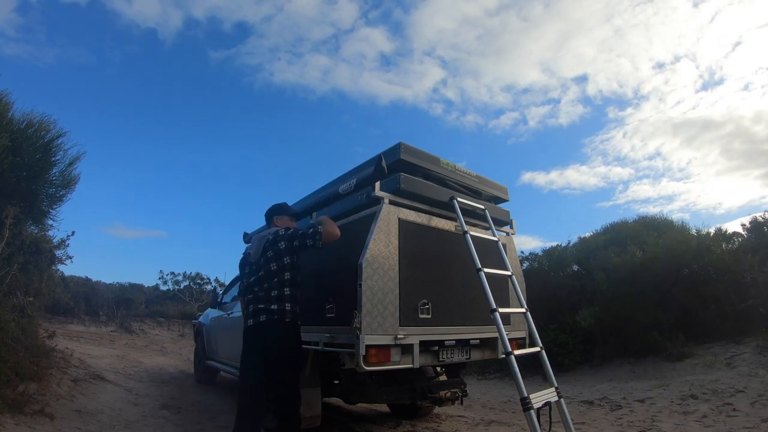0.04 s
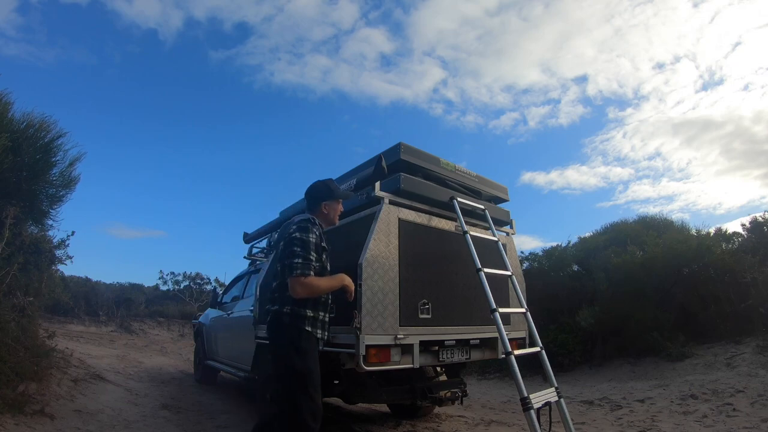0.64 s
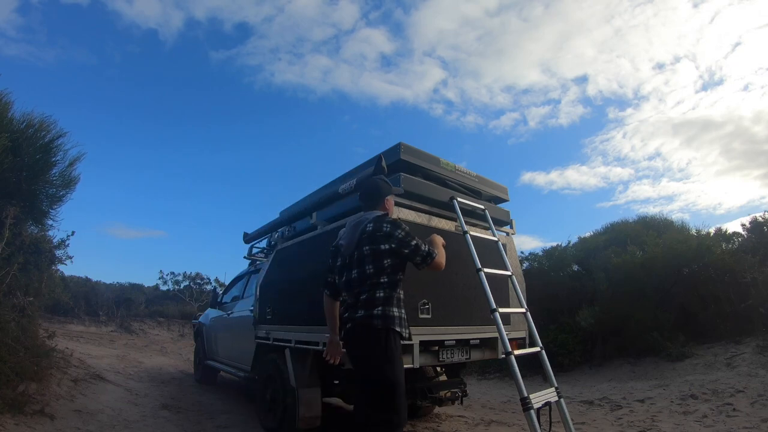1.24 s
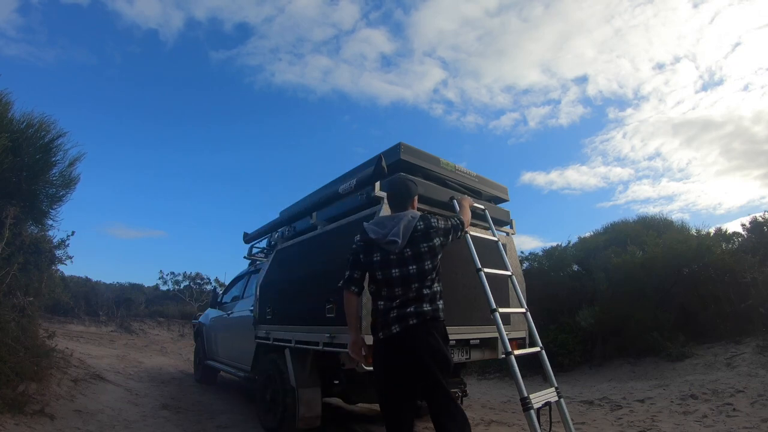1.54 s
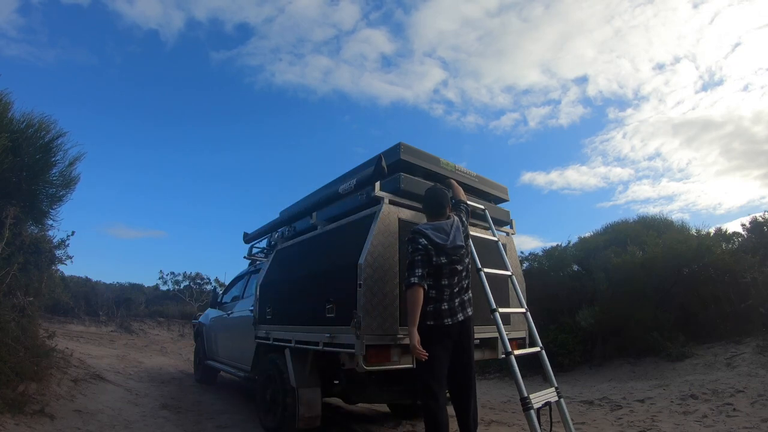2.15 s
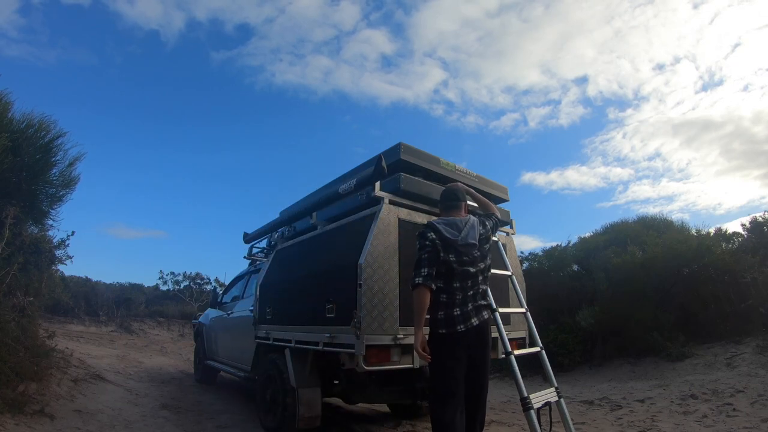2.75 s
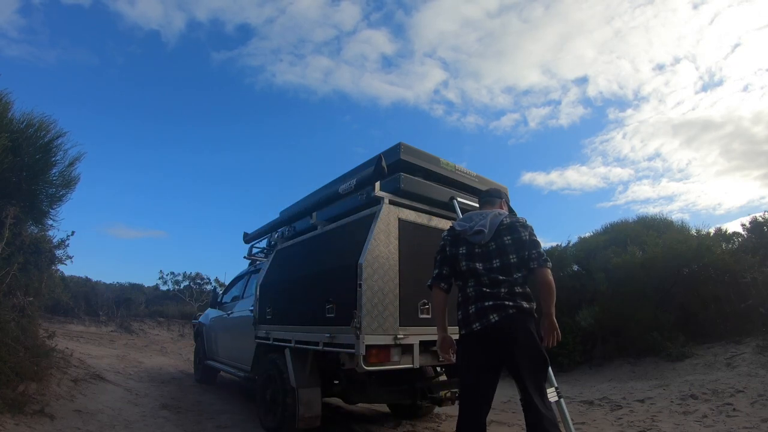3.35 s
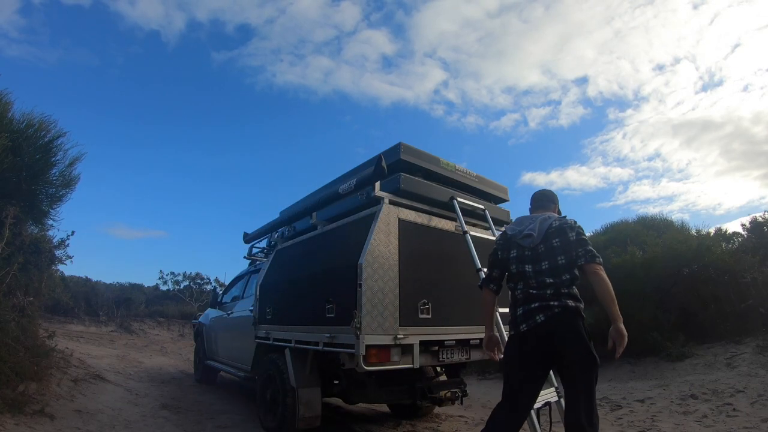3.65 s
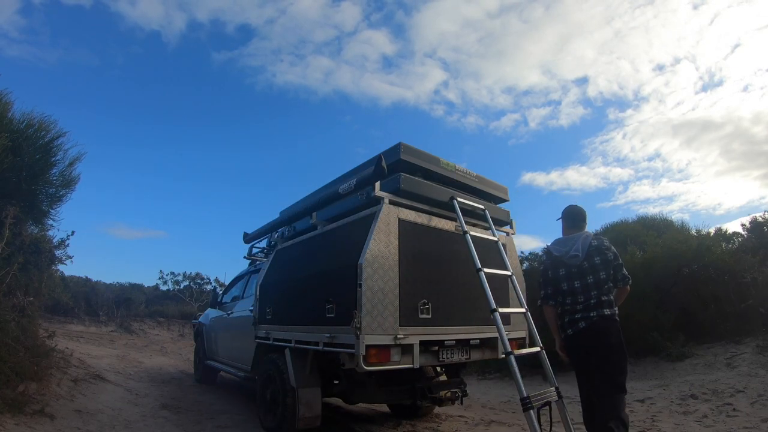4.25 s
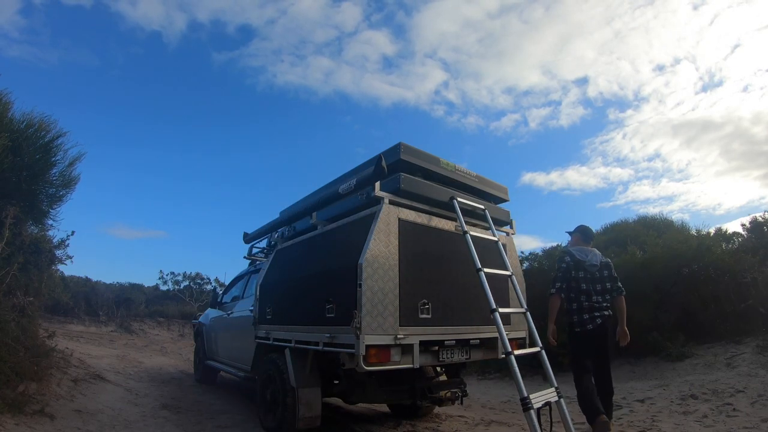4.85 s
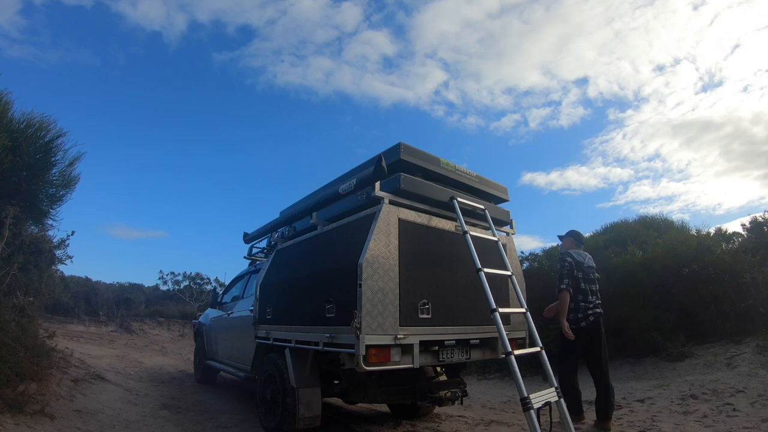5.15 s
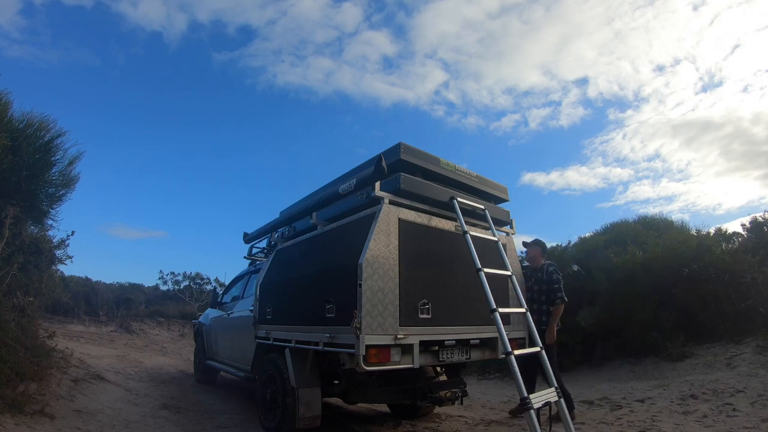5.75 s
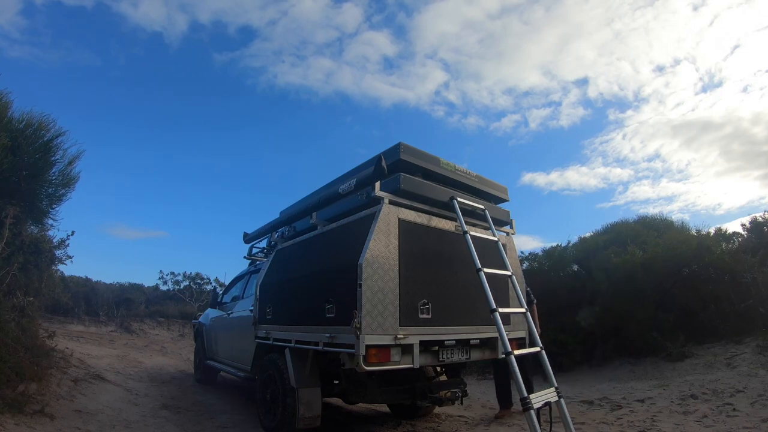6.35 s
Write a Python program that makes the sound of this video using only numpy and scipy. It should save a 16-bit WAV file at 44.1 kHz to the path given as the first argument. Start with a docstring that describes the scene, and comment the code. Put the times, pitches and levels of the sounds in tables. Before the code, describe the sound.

Light wind rumbles on the microphone throughout, over a soft outdoor hush of scrub. It gusts during the first 0.7 seconds, and shoes scuff faintly in sand around 0.4 and 1.1 seconds. From about 1.9 to 2.6 seconds, a fabric cover is pulled over a rooftop tent in two quick, rasping swishes that trail off. Its folds snap sharply as they jerk taut, most clearly at 2.1 and 2.3 seconds, while the hollow shell thuds and rings softly underneath. This is the most prominent moment. A few more faint sandy scuffs come between 2.8 and 4.7 seconds, and the wind rumble swells again from about 4 to 4.7 seconds. From around 6 to 6.5 seconds, gear shifts behind the vehicle with a quiet, dull scrape, a few small clacks and a light hollow knock.

```python
"""A sandy campsite in a light wind, where a fabric cover is pulled on a rooftop tent.
Gusts rumble on the microphone over a hush of scrub, and shoes scuff faintly in the sand.
The cloth gives two quick swishes, sticking and slipping over the hollow shell, which rings and booms;
folds snap as they jerk taut. Near the end, gear shifts behind the vehicle with a few small clacks."""
import sys
import numpy as np
from scipy import signal
from scipy.fft import rfft, irfft
from scipy.io import wavfile
from scipy.ndimage import uniform_filter1d

SR = 44100
rng = np.random.default_rng(int(sys.argv[2]) if len(sys.argv) > 2 else 0)


def dump_mix(stems):
    """Bounce the given channels to the path in sys.argv[1] as a 16-bit WAV at rate SR."""
    frames = np.atleast_2d(stems).T  # one column per channel
    limited = np.clip(frames, -1, 1)  # hard clip at full scale
    pcm = np.round(limited * 32767).astype(np.int16)
    wavfile.write(sys.argv[1], SR, pcm)


N = 291060
TIME = np.arange(N) / SR

# gusts on the microphone: (time [s], peak rumble [dB], half-length [s])
MIC_GUSTS = [(.02, -42.5, 0.019), (.26, -41, 0.044), (.34, -40, 0.054), (.49, -46, 0.038),
             (.635, -44, 0.019), (.73, -70, 0.02), (1.13, -51, .14), (2.12, -52.5, 0.2),
             (4.08, -48.5, 0.063), (4.245, -42.5, 0.022), (4.3, -40, 0.028), (4.39, -49.5, 0.1),
             (4.64, -47.5, 0.047), (5.16, -53, 0.086), (5.45, -56.5, 0.1), (6.14, -50, 0.038),
             (6.38, -54, 0.052)]
LULL_DB = -60.5  # rumble between gusts
# tone of the pressure swell, mic rumble, still air and breeze: (frequency [Hz], level [dB])
SWELL_EQ = [(1, -6.5), (2.5, 4), (6.5, -12.5), (10, -12), (16, -35.5), (25, -30.5), (60, -93)]
RUMBLE_EQ = [(8, -37.5), (18, 8), (30, 4), (50, -3.5), (80, -10), (130, -31), (250, -40), (600, -63),
             (2000, -83)]
AIR_EQ = [(20, -8), (60, 0), (120, -1), (200, -5.5), (400, -6), (700, -10), (1200, -15), (2000, -19.5),
          (4000, -23), (8000, -26.5), (15500, -30)]
BREEZE_EQ = [(70, 4), (160, 2), (260, -8), (460, -8), (700, -20.5), (1500, -20), (6000, -46)]
# breeze in the scrub between gusts: (time [s], level [dB])
BREEZE_BED = [(0, -76), (1.4, -71), (3.7, -73), (4.4, -71), (6.6, -64)]
# shoes in sand: (time [s], level [dB], length [s])
SHOE_SCUFFS = [(0.412, -60.5, 0.042), (0.452, -69.5, 0.098), (1.124, -68.5, 0.16), (2.825, -69.5, 0.18),
               (3.432, -61.5, 0.04), (4.215, -68, 0.081), (4.644, -67.5, 0.065)]
# tone of grinding sand: (frequency [Hz], level [dB])
SAND_EQ = [(300, 8.5), (1000, -2), (1700, -2), (3800, -6.5), (6000, -15.5), (12000, -28)]
# soft bumps on tent and vehicle: (time [s], peak [dB], pitch [Hz])
SOFT_BUMPS = [(1.464, -55.5, 217), (1.954, -49.5, 182), (2.001, -41, 104), (2.067, -45.5, 299),
              (2.213, -49, 111), (6.10, -56.5, 232), (6.21, -60, 310), (6.272, -58, 217)]
# the shell booms as a stroke ends: (time [s], level [dB])
SHELL_BOOMS = [(2.083, -57), (2.42, -64.5), (2.58, -76)]
# strokes of the cover: first slide, tug, long pull, run-out, trailing slide, last brush
# (start [s], attack [s], hold [s], release [s], level [dB], brightness [dB/octave])
COVER_PULLS = [(1.874, 0.018, 0.086, 0.21, -59.5, 0.4), (1.963, 0.06, 0.059, 0.037, -52.5, 0.5),
               (2.091, 0.11, 0.085, 0.2, -52, -0.1), (2.305, .02, 0.038, 0.086, -60, .3),
               (2.403, 0.062, 0.13, 0.01, -66, 0.7), (2.55, 0.019, 0.036, 0.01, -66.5, -3)]
# tone of the cloth's fine slips and coarse grit: (frequency [Hz], level [dB])
CLOTH_EQ = [(150, 4), (270, 4.5), (470, -1.5), (730, 2.5), (900, -0.5), (1500, 3), (1850, -2), (2300, -2),
            (3800, -3), (5000, -9), (6100, -18.5), (7500, -8), (10500, -17), (15500, -24)]
GRIT_EQ = [(400, -10), (900, 0), (2500, 0), (4500, -6.5), (6000, -25), (12000, -30)]
# rasp of the weave, higher as the cloth speeds up: (time [s], centre [Hz], width [Hz], level [dB])
WEAVE_RASP = [(1.88, 1400, 695, -85), (1.89, 1350, 799, -57), (1.981, 1700, 898, -74),
              (2.035, 1750, 803, -59), (2.065, 1700, 700.4, -68), (2.131, 1500, 888, -66),
              (2.21, 2300, 2381, -55), (2.221, 2900, 2800, -49), (2.248, 2700, 2412, -47.5),
              (2.261, 2450, 2606, -56), (2.28, 2200, 2005, -49), (2.31, 1750, 1910, -53.5),
              (2.35, 1470, 593, -57), (2.393, 1500, 740, -56), (2.43, 1400, 498, -119)]
# resonances of the tent's panel: (frequency [Hz], width [Hz], gain [dB])
PANEL_MODES = [(892, 47, 3), (1140, 33, 0), (1478, 14, 1), (1640, 26, -9), (2070, 17, -12), (2190, 20, 2),
               (2320, 22, 1), (2510, 25, -5), (2840, 45, -19)]
# folds snap taut: (time [s], peak [dB], pitch [Hz], crack against swing [ratio])
FOLD_SNAPS = [(1.955, -39, 1680, 0.3), (1.981, -48, 1300, .3), (2.07, -33, 1540, 0.74),
              (2.0802, -32.5, 930, 0.67), (2.0842, -60, 870, .3), (2.2032, -38.5, 950, .2),
              (2.229, -43, 3000, 0.8), (2.272, -32.5, 1400, 0.31), (2.2902, -29.5, 1018, 0.67),
              (2.572, -49.5, 650, .1)]
# gear shifts behind the vehicle: (start [s], attack [s], hold [s], release [s], level [dB])
GEAR_MOVES = [(5.97, 0.14, 0.288, 0.031, -65.5), (6.495, 0.029, 0.014, 0.037, -70)]
# tone of its dull scrape: (frequency [Hz], level [dB])
SCRAPE_EQ = [(50, 5), (110, -13), (320, 9.5), (500, -6), (1200, -4), (3000, -15.5), (6000, -31),
             (12000, -53)]
# hard edges meet: (time [s], level [dB], pitch [Hz], decay [s])
EDGE_TICKS = [(6.055, -54, 3600, .0005), (6.1015, -51, 1900, .0009), (6.113, -57.5, 4240, 0.0029),
              (6.2796, -51, 1200, .002), (6.354, -53, 1300, .001), (6.3848, -49.5, 2000, .0016)]
# small parts clack: (time [s], level [dB], centre [Hz], width [Hz], length [s], clean ring [0-1])
GEAR_CLACKS = [(6.1015, -53.5, 1290, 800, 0.019, 0.2), (6.111, -55, 727, 350, 0.048, 0.6),
               (6.1132, -52, 2100, 1800, 0.023, 0.06), (6.203, -64, 1900, 2400, 0.035, 0),
               (6.21, -60, 2800, 2400, 0.022, 0), (6.27, -60, 2000, 2245, 0.11, 0),
               (6.2775, -51.5, 1250, 250, 0.024, 0.6), (6.384, -50, 1325, 900, 0.029, 0.15),
               (6.385, -61.5, 2590, 1600, 0.044, 0.24), (6.414, -60, 1100, 1010, 0.059, 0)]
# tone of their chatter: (frequency [Hz], level [dB])
CHATTER_EQ = [(150, -20), (450, 1), (700, 10), (1300, 6), (1900, 1), (3000, -4.5), (4400, -16), (6000, -29),
              (15000, -32)]
# ring of the knocked hollow part: (frequency [Hz], level [dB])
HOLLOW_MODES = [(641, -5), (1497, -3), (1723, -8.5)]


def amp(db):
    return 10 ** (np.asarray(db) / 20)


def unit(x):
    return x / np.sqrt(np.mean(x ** 2) + 1e-30)


def noise():
    return rng.standard_normal(N)


def add(mix, s, sound):
    part = mix[round(s * SR):][:len(sound)]
    part += sound[:len(part)]


def colour(x, eq):
    """Shapes x with an EQ curve and sets its rms to 1."""
    hz, db = np.transpose(eq)
    bins = np.fft.rfftfreq(len(x), 1 / SR)
    gain_db = np.interp(np.log(bins + 1e-3), np.log(hz), db, right=-140)
    return unit(irfft(rfft(x) * amp(gain_db), len(x)))


def resonate(x, hz, width):
    """A band-pass resonance with a gain of 1 at its centre."""
    turn = np.exp(2j * np.pi * np.cumsum(np.full(len(x), hz)) / SR)
    pole = np.exp(-np.pi * width / SR)
    return 2 * (turn * signal.lfilter([1 - pole], [1, -pole], x / turn)).real


def wander(hz):
    """Random drift of rms 1 that turns about hz times a second."""
    return unit(np.interp(TIME * hz, np.arange(N), noise()))


def stroke(start, attack, hold, release):
    """Envelope of one movement: it gathers, holds and lets go."""
    since = TIME - start
    return np.clip(np.minimum(since / attack, 1 - (since - attack - hold) / release), 0, 1)


def swells(rows):
    """Summed power of bell-shaped swells: (time [s], peak [dB], half-length [s])."""
    return sum(amp(db) ** 2 * np.exp(-((TIME - s) / half) ** 2) for s, db, half in rows)


def steadied(x):
    """Compresses a noise's own slow swells, so that the gusts set its level."""
    return unit(x / np.sqrt(uniform_filter1d(x ** 2, size=4000) + 0.33))


def gustiness(smoothing_s=0.037):
    """How far the wind stands above a lull, in dB."""
    power = uniform_filter1d(swells(MIC_GUSTS), size=int(smoothing_s * SR))
    return 10 * np.log10(1 + power / amp(LULL_DB) ** 2)


def wind():
    """Eddies press on the microphone: a slow sub-bass swell and a lumpy rumble."""
    swell_db = -25 + 0.65 * gustiness() - 2 * TIME  # rides the gusts as it fades
    swell = steadied(colour(noise(), SWELL_EQ)) * amp(swell_db)
    rumble = steadied(colour(noise(), RUMBLE_EQ)) * np.sqrt(amp(LULL_DB) ** 2 + swells(MIC_GUSTS))
    return swell + rumble


def air():
    """The steady hush of open scrub, and a low breeze that lifts with the gusts."""
    hush = colour(noise(), AIR_EQ) * amp(-64.5)
    breeze_db = np.interp(TIME, *np.transpose(BREEZE_BED)) + 0.42 * gustiness()
    return hush + colour(noise(), BREEZE_EQ) * amp(breeze_db)


def slips(per_s, spread_db):
    """Tiny stick-slip clicks of uneven size."""
    sizes = amp(spread_db * np.minimum(rng.exponential(1, N), 4))
    return unit(np.sign(noise()) * sizes * (rng.random(N) < per_s / SR))


def scuffs():
    """Sand grinds under a shoe, swelling quickly and tailing off."""
    push = np.zeros(N)
    for s, db, length in SHOE_SCUFFS:
        age = np.maximum(TIME - s, 0) / (0.33 * length)  # peaks a third of the way in
        push += amp(db) * age * np.exp(1 - age)
    return push * colour(slips(per_s=4200, spread_db=4.5), SAND_EQ)


def shell():
    """The hollow tent shell thuds when bumped, drones under the rubbing and booms as a stroke ends."""
    strength, _ = rubbing()
    drone = amp(-63.5) * (strength / strength.max()) ** 0.35
    boom_power = swells((s, db, 0.038) for s, db in SHELL_BOOMS)
    body = unit(resonate(resonate(noise(), 263, width=78), 292, width=104))
    out = body * np.sqrt(drone ** 2 + boom_power)
    t = np.arange(SR // 5) / SR
    thud = (t / 0.0058) * np.exp(1 - t / 0.0052)
    for s, db, hz in SOFT_BUMPS:
        add(out, s, amp(db) * np.sin(2 * np.pi * hz * t) * thud)
    return out


def rubbing():
    """Strength and brightness of the rubbing, as one pull blends into the next."""
    powers = np.array([(amp(db) * stroke(*timing)) ** 2 for *timing, db, _ in COVER_PULLS])
    total = powers.sum(0)
    tilt = np.array(COVER_PULLS)[:, -1] @ powers / (total + 1e-20)
    return np.sqrt(total), tilt


def ticks(per_s):
    """Catch and release: separate clicks of like size at uneven intervals."""
    catches = np.floor(np.cumsum(per_s * amp(5 * wander(per_s))) / SR)
    return unit(np.diff(catches, prepend=0) * rng.uniform(0.79, 1, N))


def cloth():
    """Fabric slides over the shell in clumps of slips and gritty ticks; faster sliding is brighter."""
    strength, tilt = rubbing()
    friction = (slips(per_s=5000, spread_db=1.5) + 0.71 * noise()) * amp(0.88 * wander(130))
    grit = amp(-8.5) * colour(ticks(per_s=170), GRIT_EQ)
    hz, frame_times, spectrum = signal.stft(colour(friction, CLOTH_EQ) + grit, SR, nperseg=256)
    brightness = np.interp(frame_times, TIME, tilt)
    octaves = np.log2(np.maximum(hz, 400) / 1800)  # the tilt pivots at 1800 Hz
    _, rub = signal.istft(spectrum * amp(octaves[:, None] * brightness), SR, nperseg=256)
    return rub[:N] * strength


def weave():
    """Threads tick over an edge: a broad rasp when fast, a narrow hollow note on a slow drag."""
    when, *columns = np.transpose(WEAVE_RASP)
    thread_hz, width_hz, db = (np.interp(TIME, when, column) for column in columns)
    thread_hz *= 1 + 0.06 * wander(59.9)  # uneven drag wobbles the pitch
    band = np.interp(np.cumsum(width_hz) / SR, np.arange(N), noise() + 1j * noise())
    rasp = (band * np.exp(2j * np.pi * np.cumsum(thread_hz) / SR)).real
    return unit(rasp) * amp(db) * (TIME > when[0]) * (TIME < when[-1])


def panel(rub):
    """The tent's hard panel rings along with what rubs it."""
    return rub + sum(amp(db) * resonate(rub, hz, width) for hz, width, db in PANEL_MODES)


def reflections(x, wet_db, per_s=1500, rt60_s=0.033):
    """Panels and ground throw back a thin, short scatter."""
    t = np.arange(SR // 10) / SR
    taps = rng.standard_normal(len(t)) * (rng.random(len(t)) < per_s / SR)
    taps *= (t > 0.002) * amp(-60 * t / rt60_s)
    return x + amp(wet_db) * signal.fftconvolve(x, taps / np.linalg.norm(taps))[:N]


def snaps():
    """A fold jerks tight: a sharp crack, one swing of pressure and a short flutter."""
    out, t = np.zeros(N), np.arange(SR // 20) / SR
    crack = np.sin(2 * np.pi * 3500 * t) * (t / 0.00028) * np.exp(1 - t / 0.00024)
    crack += 0.12 * np.sin(2 * np.pi * 8300 * t) * np.exp(-t / 0.0002)
    for s, db, hz, bright in FOLD_SNAPS:
        swing = np.sin(2 * np.pi * hz * t) * np.exp(-t * hz / 1.75)
        snap = swing + bright * crack
        rustle = colour(rng.standard_normal(len(t)), CLOTH_EQ)
        flutter = unit(resonate(rustle, hz, width=2600)) * np.exp(-t / 0.008)
        add(out, s, amp(db) * (0.075 * flutter - snap / abs(snap).max()))
    return out


def gear_scrape():
    """Gear shifts against the vehicle's panels with a dull, uneven scrape."""
    push = sum(amp(db) * stroke(*timing) for *timing, db in GEAR_MOVES)
    return colour(noise(), SCRAPE_EQ) * push * amp(1.2 * wander(35))


def contacts():
    """Hard edges meet with a dry tick, giving the clacks their attack."""
    out, t = np.zeros(N), np.arange(SR // 40) / SR
    for s, db, hz, decay in EDGE_TICKS:
        add(out, s, amp(db) * np.sin(2 * np.pi * hz * t) * np.exp(-t / decay))
    return out


def clacks():
    """Small hard parts chatter together, each ringing at its own damped resonance."""
    out, t = np.zeros(N), np.arange(SR // 6) / SR
    for s, db, hz, width, length, clean in GEAR_CLACKS:
        chatter = unit(resonate(colour(rng.standard_normal(len(t)), CHATTER_EQ), hz, width))
        ring = np.sqrt(1 - clean) * chatter + np.sqrt(2 * clean) * np.sin(2 * np.pi * hz * t)
        add(out, s, amp(db - 60 * (t / length) ** 1.5) * ring)  # holds briefly, then stops
    return out


def knock(at_s=6.3548, db=-50.5, length_s=0.027):
    """A hollow part takes a knock and rings briefly, rattling against its seat."""
    out, t = np.zeros(N), np.arange(SR // 6) / SR
    ring = sum(amp(mode_db) * np.sin(2 * np.pi * hz * t) for hz, mode_db in HOLLOW_MODES)
    rattle = amp(-6.5) * colour(rng.standard_normal(len(t)), CHATTER_EQ)
    add(out, at_s, amp(db - 60 * (t / length_s) ** 4.4) * (ring + rattle))
    return out


def scene():
    """Mono mix: cover, gear and shoes over a bed of air and wind."""
    cover = reflections(panel(cloth() + weave()) + snaps(), wet_db=-12.5)
    gear = reflections(contacts() + clacks() + knock(), wet_db=-16)
    return (cover + gear + shell() + gear_scrape() + scuffs() + air() + wind())[None]


def record(dry):
    """A steep high cut trims the very top of the mix."""
    taps = signal.firwin(511, cutoff=15720, window=("kaiser", 9), fs=SR)
    padded = np.pad(dry, ((0, 0), (255, 255)), mode="edge")
    return signal.oaconvolve(padded, taps[None], "valid")


dry = scene()
out = record(dry)
dump_mix(out)
```